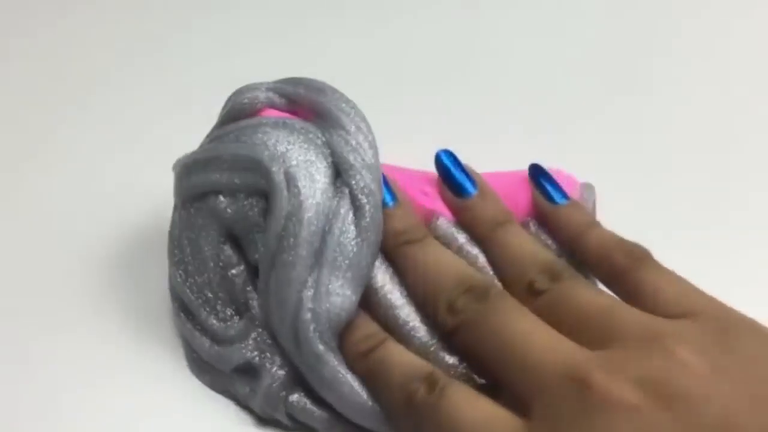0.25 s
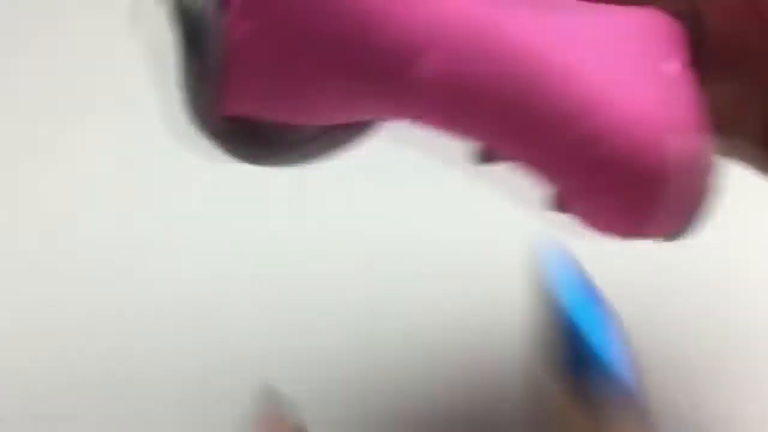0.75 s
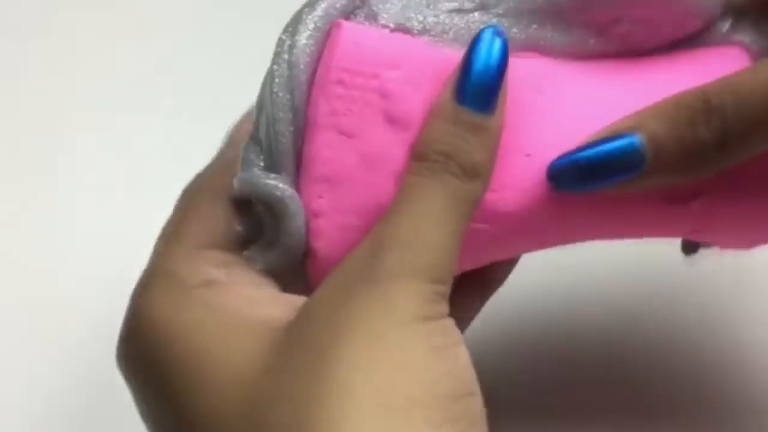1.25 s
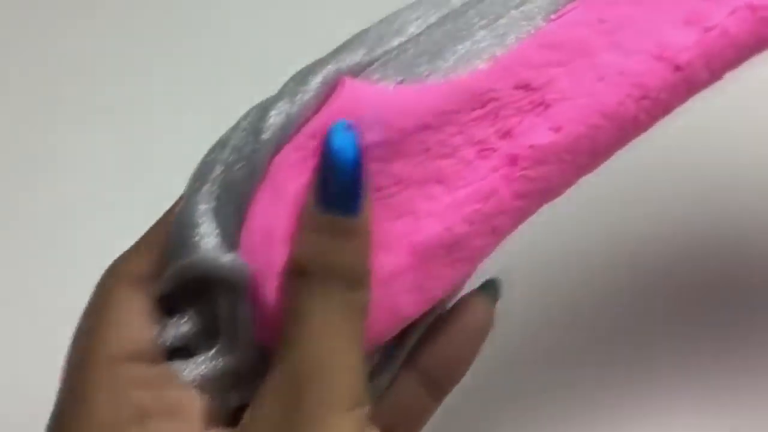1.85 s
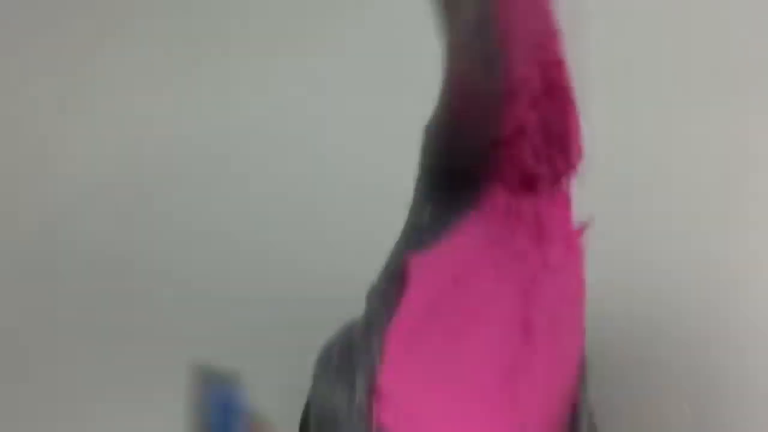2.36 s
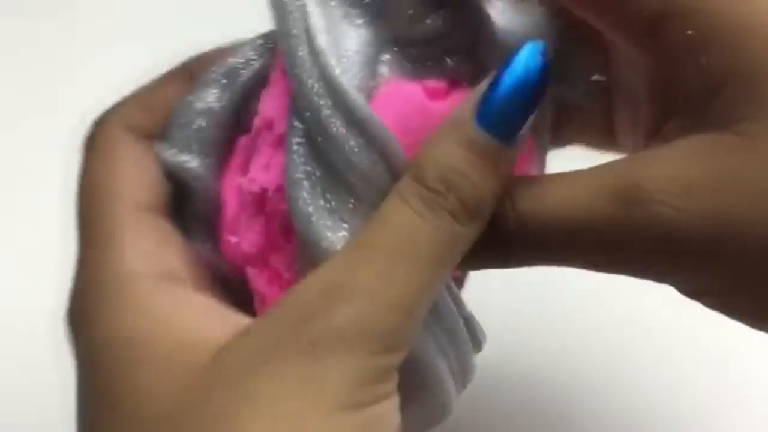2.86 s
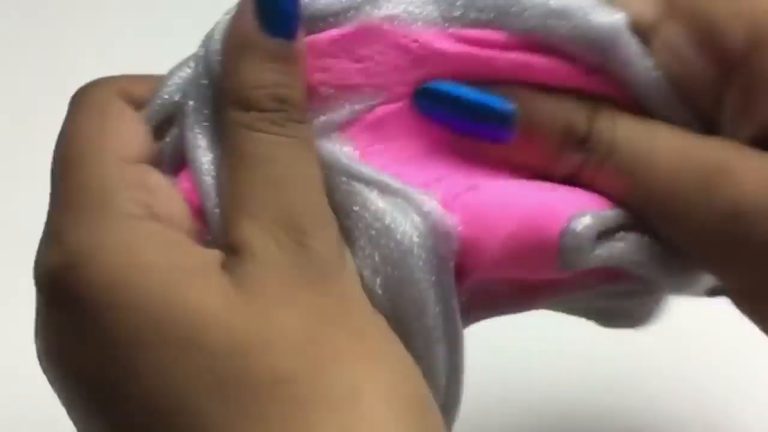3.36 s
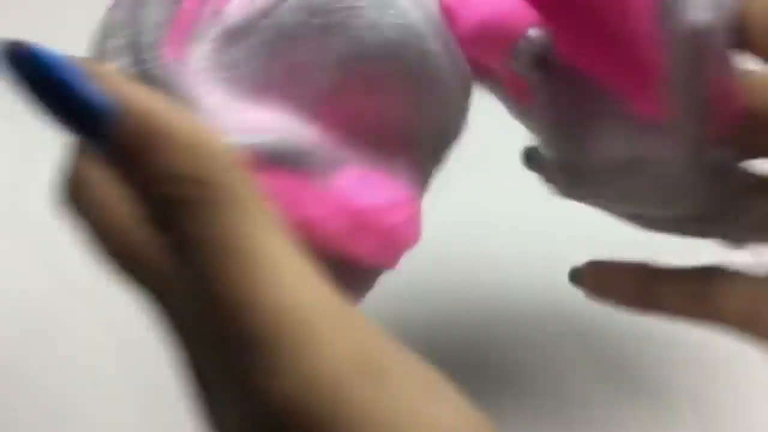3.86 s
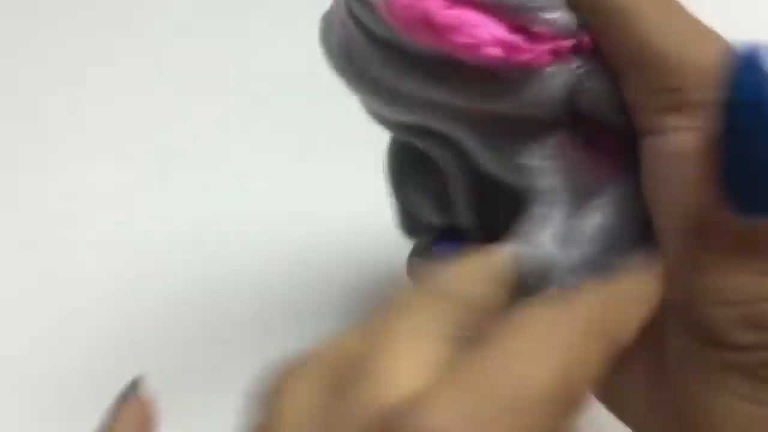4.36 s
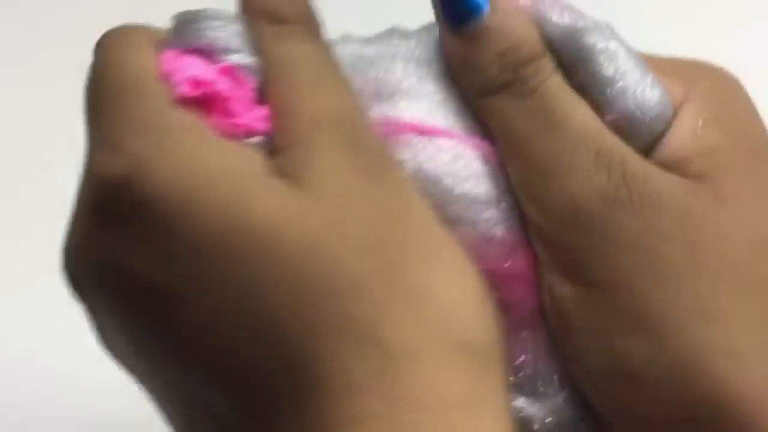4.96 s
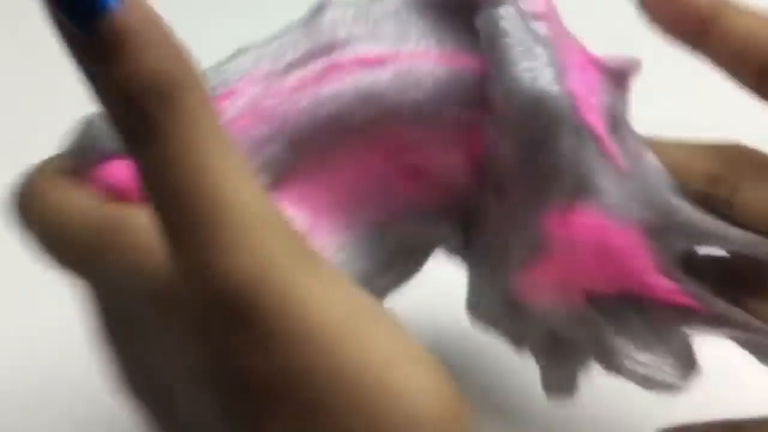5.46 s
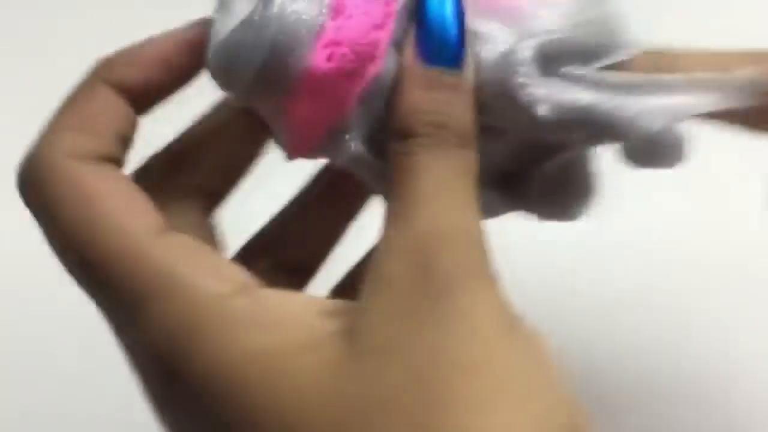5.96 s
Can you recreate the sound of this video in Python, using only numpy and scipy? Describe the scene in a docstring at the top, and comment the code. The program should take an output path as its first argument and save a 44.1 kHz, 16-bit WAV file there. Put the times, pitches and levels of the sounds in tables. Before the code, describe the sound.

Close, sticky crackling and squelching of slime being kneaded, with air bubbles popping in a small, quietly humming room.

```python
"""Sticky slime, close up

At a table in a small room, two hands peel off a lump of slime, then stretch, fold and squeeze it
close to the microphone. Tiny threads and bubbles tear in dense crackles, folds of air squish open,
and trapped air pockets burst as single pops. The walls give a short echo, and an appliance
hums low in the background."""
import sys
import numpy as np
from scipy import signal
from scipy.fft import rfft, irfft, next_fast_len
from scipy.io import wavfile
from scipy.ndimage import map_coordinates

SR = 44100
rng = np.random.default_rng(int(sys.argv[2]) if len(sys.argv) > 2 else 0)


def transcribe(u):
    """Save the signal u as a 16-bit wav file named by the first command-line argument.

    u: samples, shape (n,) or (channels, n), limited to [-1, 1]; the rate is SR.
    q: integer samples, one column per channel.
    """
    v = np.clip(np.atleast_2d(u).T, -1, 1)
    q = np.round(v * 32767).astype(np.int16)
    wavfile.write(sys.argv[1], SR, q)


N = 274302


def kneading(squelch_db, crackle_db, fizz_db):
    """Slime right at the microphone: big pockets squelch, small bubbles crackle, fine threads fizz."""
    # Spectra of the three sizes of tear: frequency_hz, level_db
    pockets = [(130, -38.5), (250, -4.5), (330, -5.5), (450, -9), (580, -5), (700, -4), (850, -2.5),
               (1100, -8), (1500, -8.5), (2600, -53.5)]
    bubbles = [(600, -35), (1100, -7), (1450, -1), (2000, 0), (2700, -1.5), (3500, -4), (4500, -10),
               (7000, -32)]
    threads = [(2200, -30), (3400, -7), (4300, -1.5), (5600, 0), (6500, -2), (7800, -2.5), (9400, -3.5),
               (10400, -8.5), (12000, -7), (14000, -8), (17000, -12)]
    squelch = tearing(squelch_db, pockets, base_rate=900, spread_db=1.5, clump_db=3.0, room_db=-1.5)
    crackle = tearing(crackle_db, bubbles, base_rate=2200, spread_db=2.0, clump_db=2.5, room_db=-4.5)
    fizz = tearing(fizz_db, threads, base_rate=4000, spread_db=2.5, clump_db=1.2, room_db=-4.5)
    return amp(1.0) * squelch + amp(0.96) * crackle + amp(0.58) * fizz


def tearing(level_db, spectrum, base_rate, spread_db, clump_db, room_db):
    """One size of tear: a harder pull breaks more threads a second, in clumps."""
    pull = amp(.6 * (level_db + 50.5))
    grains = struck(tears(base_rate * pull, spread_db), spectrum)
    grains = unit(reshaped(grains, patchy_db=2.5))
    dry = amp(level_db) * unit(grains * amp(clump_db * wobble(110)))
    # the hands move, so the pattern of reflections keeps changing
    turn = 1.65 * wobble(7)
    wet = np.cos(turn) * room(dry) + np.sin(turn) * room(dry)
    return (dry + amp(room_db) * wet) / np.hypot(1, amp(room_db))


def tears(rate, spread_db):
    """Threads break as random impulses of uneven size, rate a second, with a mean power of 1."""
    chance = np.clip(rate / SR, 1e-5, 1)
    size = unit(amp(spread_db * np.clip(rng.standard_normal(N), -2, 2)))
    return (rng.random(N) < chance) * rng.choice([-1, 1], N) * size / np.sqrt(chance)


def struck(x, spectrum):
    """Minimum-phase colour: each impulse starts sharply and rings off."""
    size = 4096
    gain = amp(along(spectrum, np.fft.rfftfreq(size, 1 / SR)))
    cepstrum = irfft(np.log(gain))
    cepstrum[1:size // 2] *= 2
    cepstrum[size // 2 + 1:] = 0
    return signal.fftconvolve(x, irfft(np.exp(rfft(cepstrum))))[:N]


def reshaped(x, patchy_db):
    """The lump changes shape, so different pitches come forward from moment to moment."""
    hz, t, bands = signal.stft(x, SR, nperseg=512)
    knots = rng.standard_normal((64, 512))
    place = np.meshgrid(3.618 * np.log2(1 + hz / 300), 20 * t, indexing="ij")
    gain = unit(amp(patchy_db * map_coordinates(knots, place, mode="wrap")))
    return signal.istft(bands * gain, SR, nperseg=512)[1][:N]


def hand_effort():
    """Levels in dB of squelch, crackle and fizz: strokes add up over the cling of resting fingers."""
    # Pulls and squeezes:
    # peak_s, attack_s, hold_s, release_s, crackle_db, squelch_over_crackle_db, fizz_over_crackle_db
    strokes = [(0.528, 0.027, 0.013, 0.077, -45.5, -2, 3.5), (0.965, 0.36, 0.31, .2, -65, -8, -2.5),
               (1.215, 0.046, 0.085, 0.083, -61.5, -5.5, 0.5), (2.233, 0.062, 0.0064, 0.22, -64, -8, 0.5),
               (2.411, 0.033, 0.0077, 0.056, -58.5, -7, -2), (2.7, 0.202, .04, .1, -66, -12, 2.5),
               (2.803, 0.048, .015, 0.0626, -55.5, -10, 0), (3.314, 0.0135, 0.084, .13, -59, -3, 3.5),
               (3.388, .025, 0.0106, 0.038, -53.5, 1.5, -3), (3.508, 0.022, 0.316, 0.16, -61.5, -1, 2.5),
               (3.934, 0.11, 0.047, 0.0547, -43, -6.5, 1.5), (4.046, 0.062, 0.032, 0.15, -51.5, -8.5, -1),
               (4.332, 0.061, 0.044, 0.112, -52, -15.5, 4),
               (4.416, 0.098, 0.0254, 0.0534, -43.5, -6.5, -2.5), (4.478, 0.0295, .008, .055, -47, -1, 3.5),
               (4.791, 0.19, 0.073, .1, -67.5, -9, -1), (4.986, 0.085, 0.018, 0.155, -56.5, -6.5, 4),
               (5.098, 0.071, 0.178, 0.3, -66.5, -5.5, 8.5), (5.369, 0.066, 0.039, .16, -40.5, -6.5, 2),
               (5.527, .025, 0.061, .05, -46, -2.5, 3.5), (5.664, 0.051, 0.043, 0.043, -46.5, -5, .5),
               (5.918, 0.33, 0.043, 0.176, -57, -5.5, 0.5), (5.994, 0.095, 0.0696, 0.076, -51.5, -4.5, 2),
               (6.148, 0.058, 0.0423, 0.092, -54, -.5, -0.5)]
    # Slime clinging to resting fingers at the start: squelch_db, crackle_db, fizz_db
    rest_db = (-78.5, -79, -77.5)
    stickier_db_per_s = 1.5  # the lump clings more as it is worked
    power = np.outer(amp(rest_db), amp(stickier_db_per_s * np.arange(N) / SR)) ** 2
    for peak_s, attack, hold, release, db, squelch_db, fizz_db in strokes:
        force = amp(db) * swell(peak_s, attack, hold, release)
        # big pockets open later than the threads
        power[0] += (amp(db + squelch_db) * swell(peak_s, 0.863 * attack, hold, release)) ** 2
        power[1] += force ** 2
        power[2] += (amp(fizz_db) * force) ** 2
    return 10 * np.log10(power)


def swell(peak_s, attack_s, hold_s, release_s):
    """Gain of one stroke: it builds to its peak, sags as the held slime yields, then lets go."""
    fade_db, sag_db_per_s = 19.5, 4.5
    t = np.arange(0, N / SR, .001) - peak_s
    fade = np.maximum(-t, 0) / attack_s + np.maximum(t - hold_s, 0) / release_s
    gain = amp(-fade_db * fade - sag_db_per_s * np.clip(t, 0, hold_s))
    return np.interp(np.arange(N) / SR - peak_s, t, gain * (fade < 4))


def pops():
    """The larger air pockets burst one by one, each with its own echo."""
    # Bursting air pockets: start_s, cavity_hz, cavity_db, snap_hz, snap_db, room_db
    bursts = [(.5251, 2040, -25.5, 6300, -18.5, -14), (0.5339, 1100, -24, 8000, -15.5, -5),
              (.9869, 1560, -34, 9200, -24, -3), (1.1877, 1370, -28, 6250, -39.5, 0.5),
              (1.2268, 1644, -22.5, 3610, -23, -17), (1.2545, 2000, -52, 9500, -32.5, 3),
              (1.3222, 1980, -33.5, 5530, -28, -1), (1.7295, 3170, -40, 10700, -28, -13),
              (1.8852, 1940, -40, 6650, -46, -6), (2.0025, 1700, -41.5, 8300, -32.5, -5),
              (2.2301, 2020, -35, 9400, -35, 5.5), (2.4235, 1610, -32.5, 8050, -23.5, -4.5),
              (2.731, 2340, -28.5, 7400, -29.5, 1), (3.0159, 2430, -27, 7300, -23.5, -7),
              (3.054, 2200, -34.5, 6300, -17.5, -14), (3.319, 1720, -28, 6600, -16.5, 0),
              (3.362, 1740, -43, 8630, -20, -7), (3.3936, 2900, -30, 6130, -15.5, -12),
              (3.4184, 2830, -29, 6160, -19.5, -2), (3.5007, 2890, -21.5, 6500, -12, -14),
              (3.6352, 2200, -56, 8900, -23.5, -5), (3.9389, 2700, -20, 6240, -9.5, 0),
              (4.2353, 1570, -36.5, 6720, -35, -1.5), (4.535, 1880, -37, 7100, -24, -1),
              (4.6824, 1380, -50, 12600, -31.5, -6), (4.8463, 1740, -42, 11000, -27.5, -2),
              (5.0036, 2316, -23.5, 4350, -17.5, -19), (5.0291, 870, -36, 7220, -25, -13),
              (5.115, 770, -24, 5330, -1, -7.5), (5.1159, 4440, -14, 8400, -2.5, -5.5),
              (5.2533, 2060, -12.5, 4920, -12.5, -6), (5.354, 1880, -23, 6630, -11, -5),
              (5.477, 1050, -24.5, 4500, -24.5, -5), (5.5197, 1510, -28, 4900, -15, -2),
              (5.5768, 3030, -17.5, 5600, -13.5, -16.5), (5.6488, 1600, -35, 5100, -22, 1.5),
              (5.8051, 2105, -18.5, 9800, -3.5, -16.5), (6.0622, 2420, -23, 5540, -21, 1),
              (6.155, 1630, -28, 5400, -17, -0.5), (6.1857, 860, -24, 6840, -37, -5)]
    out = np.zeros(N + SR)
    for start_s, *pocket, room_db in bursts:
        dry = pop(*pocket)
        sound = amp(room_db) * room(dry)
        sound[:len(dry)] += dry
        out[round(start_s * SR):][:len(sound)] += sound
    return out[:N]


def pop(cavity_hz, cavity_db, snap_hz, snap_db):
    """A film snaps with a sharp tick, and the opened air pocket rings briefly."""
    t = np.arange(SR // 40) / SR
    ring_scale = 0.94 * amp(.15 * max(cavity_db, snap_db))  # louder pockets ring longer
    cavity = amp(cavity_db) * ring(t, cavity_hz, cycles=0.818 * ring_scale)
    # the hole widens as the film draws back, so its note sweeps upward
    sweep = t * (1 + 0.22 * np.tanh((t - .0006) * snap_hz / 4))
    snap = amp(snap_db) * ring(sweep, snap_hz, cycles=0.98 * ring_scale, rise=0.86)
    # the rim of the film shreds for a moment after the snap
    shreds = amp(snap_db - 12 - 60 * t / .005) * rng.standard_normal(len(t))
    # a small soft source radiates little far below or above its note
    edges_hz = np.clip([.58 * snap_hz, 1.8 * snap_hz], 100, [SR / 4, SR / 2.5])
    band = signal.butter(3, edges_hz, "band", fs=SR, output="sos")
    return cavity + signal.sosfilt(band, snap + shreds)


def ring(t, hz, cycles, rise=0.44):
    """A damped resonance, with its decay and rise counted in cycles."""
    turns = t * hz
    decay = np.exp(-turns / max(cycles, .2))
    onset = 1 - np.exp(-turns / rise)
    return 1.733 * np.sin(2 * np.pi * turns) * decay * onset


def ticks(crackle_db):
    """Pinhead bubbles burst at random, louder when the slime is worked harder."""
    ticks_per_s, over_crackle_db, spread_db = 30, 22, 7
    out = np.zeros(N + SR)
    for place, size, note in rng.random((int(ticks_per_s * N / SR), 3)):
        start, pitch = int(place * N), 2 ** (note - .5)
        db = crackle_db[start] + over_crackle_db + spread_db * (2 * size - 1)
        sound = pop(cavity_hz=2000 * pitch, cavity_db=db - 14.5, snap_hz=7800 * pitch, snap_db=db)
        out[start:start + len(sound)] += sound
    return out[:N] + amp(-3) * room(out[:N])


def squishes():
    """Tearing threads ring the air in a fold, which swells open and closes again."""
    # Folds of air pressed open under a finger: middle_s, half_length_s, pitch_hz, level_db
    folds = [(.617, 0.0093, 1880, -42.5), (2.793, 0.0523, 1456, -54), (3.393, 0.0315, 610, -58),
             (3.544, 0.051, 357.3, -54.5), (3.883, 0.0135, 5660, -43.5), (3.955, 0.042, 290, -56.5),
             (4.002, 0.1, 2050, -47.5), (4.135, 0.0234, 1450, -54.5), (4.421, 0.037, 836, -48),
             (5.385, .04, 745, -50), (5.428, 0.028, 840, -44), (5.472, 0.0266, 837, -45),
             (5.562, 0.033, 3375, -40), (5.597, .03, 555, -50), (6.07, .025, 820, -51.5),
             (6.192, 0.0194, 647, -54)]
    out = np.zeros(N + SR)
    threads = tears(rate=1800, spread_db=3)
    for middle_s, half_s, hz, db in folds:
        start, size = round((middle_s - half_s) * SR), round(2 * half_s * SR)
        fold = signal.iirpeak(hz, Q=5, fs=SR)
        # walls of slime let out little but the fold's own note
        note = signal.lfilter(*fold, signal.lfilter(*fold, threads[start:start + size]))
        opening = np.hanning(size)[:len(note)] ** 2
        out[start:start + len(note)] += amp(db) * unit(note) * opening
    return out[:N] + amp(-7.5) * room(out[:N])


def lift():
    """The lump lets go of the table with a soft thump, and the tearing rings the hollow under it."""
    # Resonances of the hollow: pitch_hz, width_hz, level_db
    modes = [(305, 50, 0), (395, 70, -5), (545, 70, 0), (1120, 200, -8)]
    lift_s, thump_db, suction_db = .534, -40.5, -43

    def hollow(hz):
        """The resonances add up with alternating signs."""
        return sum((-1) ** k * amp(db) * 1j * hz * width / (pitch ** 2 - hz ** 2 + 1j * hz * width)
                   for k, (pitch, width, db) in enumerate(modes))

    threads = tears(rate=1500, spread_db=2)
    since_lift = np.maximum(np.arange(N) / SR - lift_s, 0)
    thump = ring(since_lift, modes[0][0], cycles=4.5, rise=1)
    peel = swell(lift_s, attack_s=0.03, hold_s=0.008, release_s=0.08)
    suction = peel * unit(filtered(threads, hollow))
    return amp(thump_db) * thump + amp(suction_db) * suction


def room(x, near_t60_s=0.023, walls_db=-10, gap_s=0.001214):
    """Quick scatter from the hands and table nearby, then the longer tail of the walls."""
    # Decay of the small room: frequency_hz, t60_s
    wall_decay = [(200, 0.38), (1500, 0.19), (5000, 0.15), (12000, 0.2)]
    hz, t, bands = signal.stft(rng.standard_normal(SR // 3), SR, nperseg=256)
    near = amp(-60 * t / near_t60_s)
    walls = amp(walls_db - 60 * t / along(wall_decay, hz)[:, None])
    tail = signal.istft(bands * (near + walls), SR, nperseg=256)[1]
    tail = np.pad(tail / np.linalg.norm(tail), (int(gap_s * SR), 0))
    return signal.fftconvolve(x, tail)[:N]


def appliance_hum():
    """An appliance farther back hums on a few low tones that waver in pitch and level."""
    # Tones of the hum: pitch_hz, width_hz, level_db
    tones = [(59.82, 5, -56.5), (123.3, 5.3, -66.5), (139.14, 2.5, -63.5), (241, 20, -73.5)]
    # Slow drift of the whole hum: time_s, gain_db
    drift = [(0, 1.5), (.7, -7), (1.3, 0), (2.4, 1.5), (3.4, 0), (4.6, 0), (5.7, 1.5), (6.22, 2)]
    t = np.arange(N) / SR
    hum = np.zeros(N)
    for hz, width_hz, db in tones:
        phase = 2 * np.pi * hz * t + 0.77 * wobble(2 * width_hz)
        waver = amp(3.26 * wobble(2 * width_hz))
        hum += amp(db) * unit(waver * np.sin(phase))
    return amp(np.interp(t, *np.transpose(drift))) * hum


def room_tone():
    """The soft air of the room and a faint uneven rumble."""
    # Spectra of the air and the rumble: frequency_hz, level_db
    air_spectrum = [(20, -26.5), (35, -6.5), (65, 5), (100, -4), (150, -6.5), (210, -10.5), (290, -12.5),
                    (400, -18), (800, -27), (2000, -27), (5000, -34.5), (10000, -35.5), (15000, -38.5)]
    rumble_spectrum = [(24, -46), (36, 1), (62, -2.5), (100, -8.5), (250, -13.5), (450, -50)]
    air = filtered(rng.standard_normal(N), lambda hz: amp(along(air_spectrum, hz)))
    rumble = filtered(rng.standard_normal(N), lambda hz: amp(along(rumble_spectrum, hz)))
    rumble *= amp(2.54 * wobble(10))
    return amp(-58.5) * unit(air) + amp(-65) * unit(rumble)


def amp(db):
    """Decibels to gain."""
    return 10 ** (np.asarray(db) / 20)


def unit(x):
    """x at rms 1."""
    return x / np.sqrt(np.mean(x ** 2) + 1e-20)


def along(points, hz):
    """Points of (frequency_hz, value) read on a log frequency axis."""
    frequencies, values = np.transpose(points)
    return np.interp(np.log(hz + 1), np.log(frequencies + 1), values)


def wobble(rate):
    """A smooth random curve, rate knots a second."""
    knots = rng.standard_normal(4096)
    return map_coordinates(knots, [np.arange(N) * rate / SR], mode="wrap")


def filtered(x, response):
    """x through a frequency response."""
    size = next_fast_len(N + SR // 2)
    return irfft(rfft(x, size) * response(np.fft.rfftfreq(size, 1 / SR)), size)[:N]


def scene():
    """One microphone, with the slime close by and the room behind it."""
    squelch_db, crackle_db, fizz_db = hand_effort()
    slime = kneading(squelch_db, crackle_db, fizz_db) + squishes() + lift() + pops()
    background = appliance_hum() + room_tone()
    return (slime + ticks(crackle_db) + background)[None]


def record(dry):
    """The recorder dulls the top treble and keeps nothing above its band limit."""
    shelf_hz, shelf_db, limit_hz = 13900, -17.5, 16200
    return filtered(dry[0], lambda hz: np.where(hz < shelf_hz, 1, amp(shelf_db)) * (hz < limit_hz))[None]


dry = scene()
out = record(dry)
transcribe(out)
```